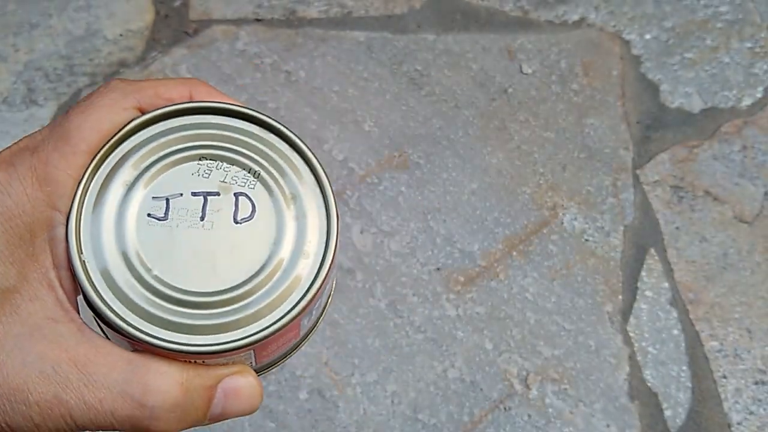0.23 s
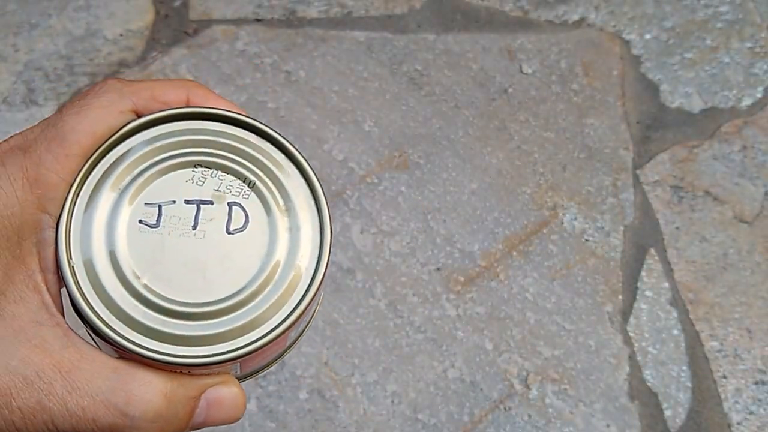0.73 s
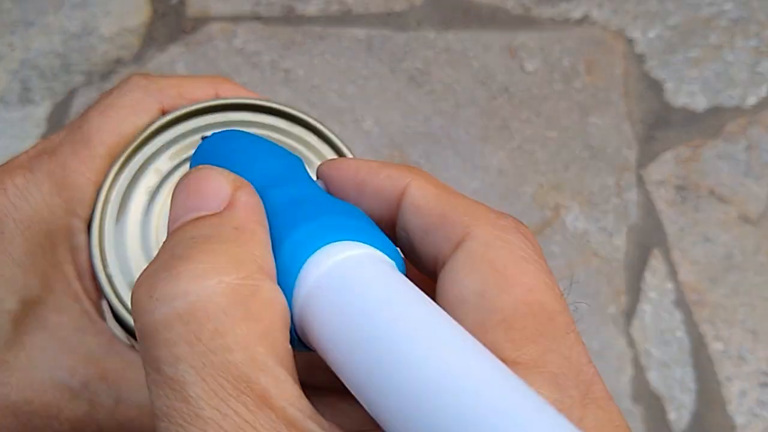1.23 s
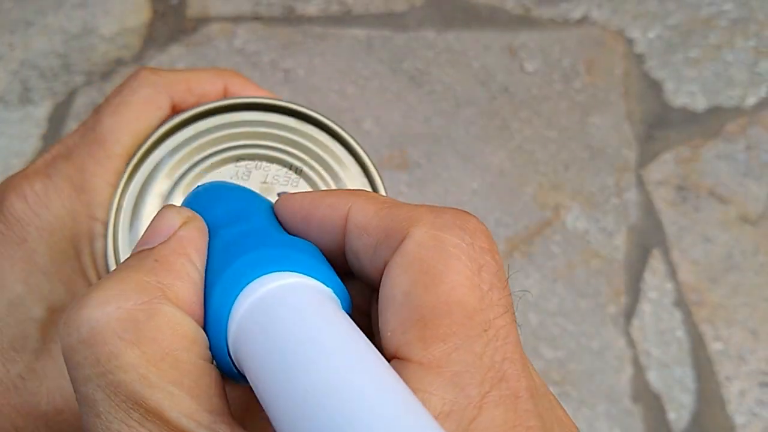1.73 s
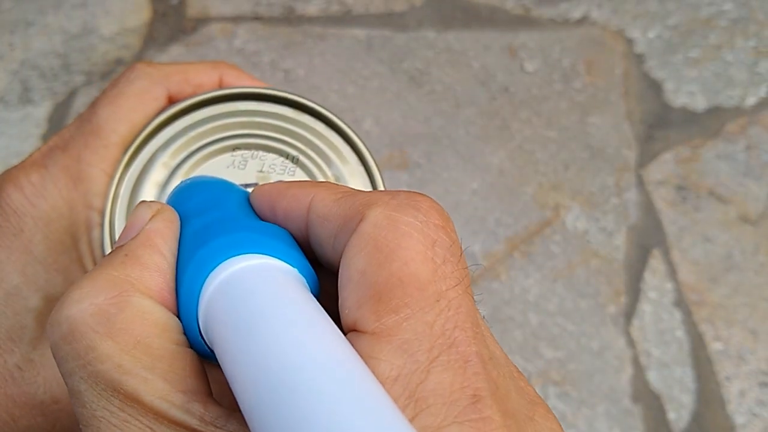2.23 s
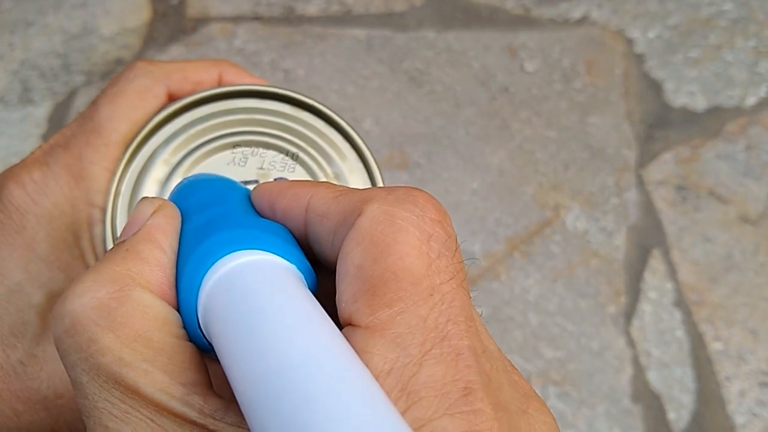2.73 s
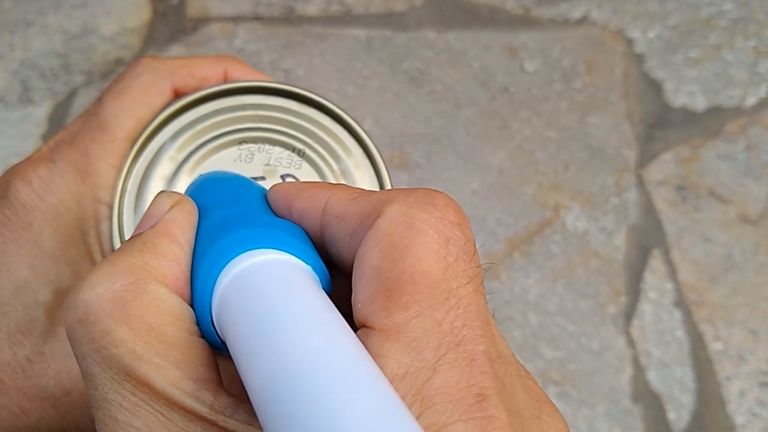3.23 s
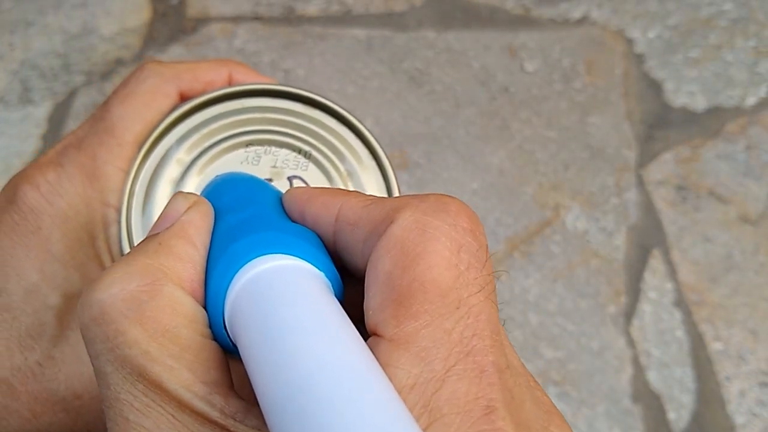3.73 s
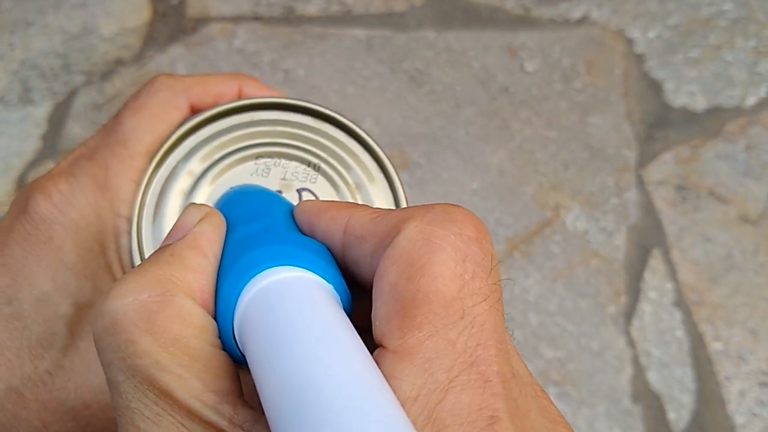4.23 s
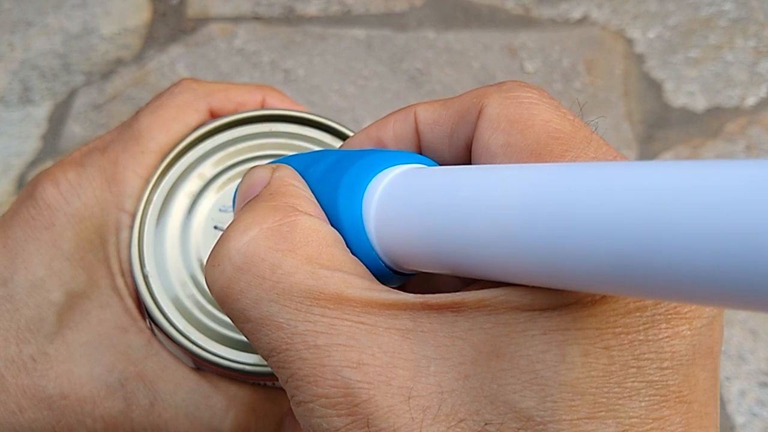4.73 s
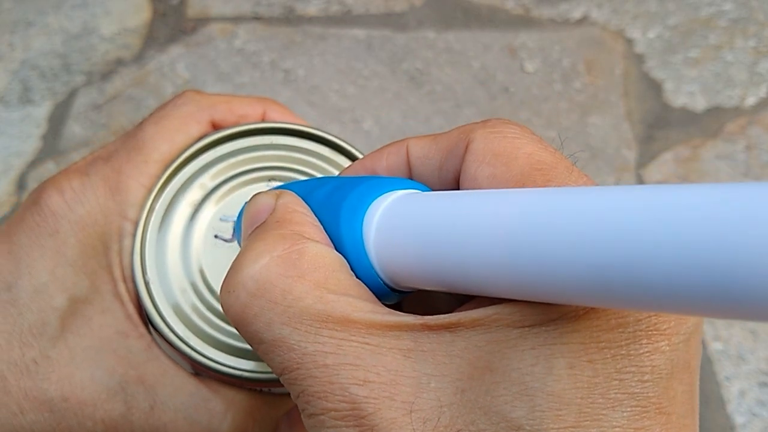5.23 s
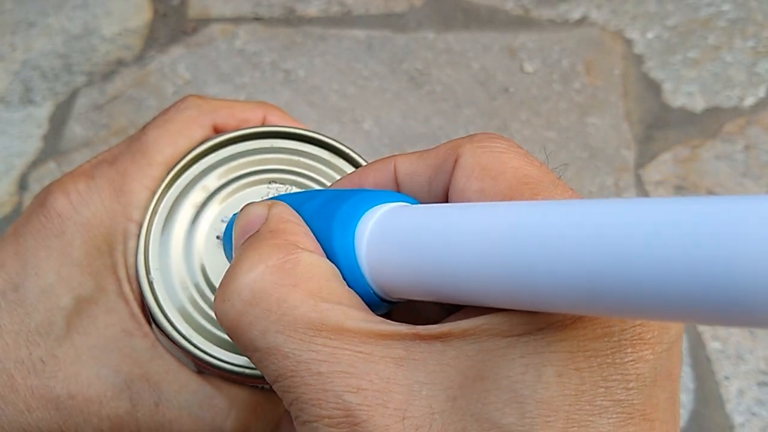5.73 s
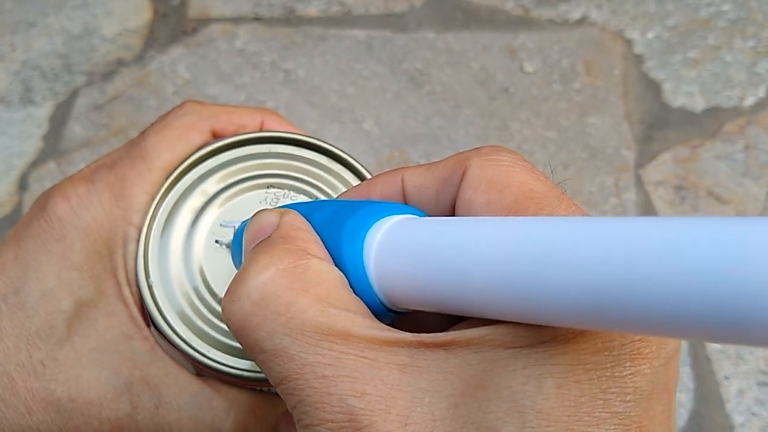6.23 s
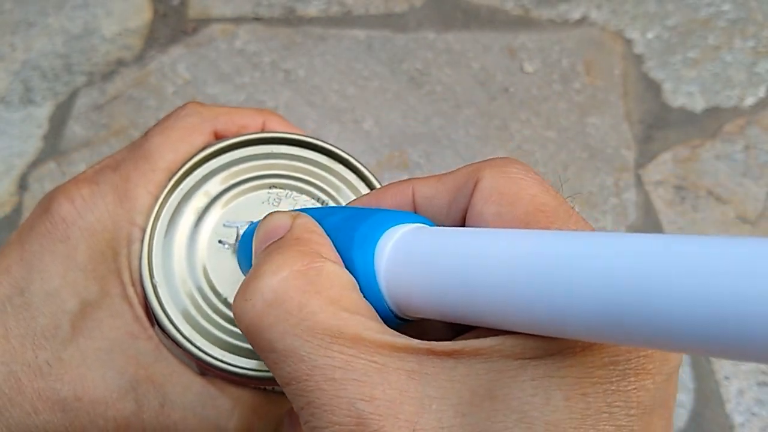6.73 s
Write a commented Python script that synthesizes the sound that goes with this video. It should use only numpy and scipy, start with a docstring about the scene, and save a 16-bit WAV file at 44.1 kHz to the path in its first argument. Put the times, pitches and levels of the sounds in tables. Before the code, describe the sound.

Fingers rub over a can and rubbery grip, with a little knock and faint squeaks, very quietly. A tiny electric engraver gives a quick test buzz, then starts properly. Bright, gritty, metallic buzzing comes and goes as the tip touches and lifts, the motor sagging under pressure and whining freely between strokes. A brief break splits two runs. Close, dry microphone, faint hiss, small dry ticks.

```python
"""Burr of a battery etching pen engraving a tin can lid, outdoors, close: two strikes a turn ring the lid's modes.
Strokes slow the motor, and its whine fades with drag; between them it runs free. One rotor times both.
The bit rings on after each lift. Fingers rub and slip in filtered grains and clicks; faint sine squeaks fall.
Also one knock (click, sinking thud), small dry ticks and a coloured hiss."""
import sys
import numpy as np
from scipy import signal
from scipy.fft import rfft, irfft, next_fast_len
from scipy.io import wavfile
from scipy.ndimage import uniform_filter1d

SR = 44100
rng = np.random.default_rng(int(sys.argv[2]) if len(sys.argv) > 2 else 0)


def inscribe(sig):
    """Save sig as 16-bit PCM at rate SR to the path in sys.argv[1].

    A 1-D sig is mono; a 2-D sig holds one channel per row.
    Samples are clipped to [-1, 1] before scaling.
    """
    pcm = np.round(np.clip(np.atleast_2d(sig).T, -1, 1) * 32767)
    wavfile.write(sys.argv[1], SR, pcm.astype(np.int16))


N = 307818
T = np.arange(N) / SR
SIZE = next_fast_len(N + 8192)
FREQ_HZ = np.maximum(np.arange(SIZE // 2 + 1) * SR / SIZE, 1)

# background hiss: t/s, relative level/dB
AIR_LEVEL = [(0, -72), (.6, -74), (1.22, -72.5), (1.27, -78.5), (6.98, -87)]
# hiss spectrum: f/Hz, gain/dB
AIR_COLOUR = [(18, -61), (30, -21), (184, -11.5), (303, -9.5), (364, -15), (540, -13), (666, -18.5),
              (2830, -26), (5310, -29), (16000, -29.5)]
# further filter on the side signal of the hiss: f/Hz, gain/dB
AIR_SIDE_COLOUR = [(100, -11.5), (380, 7.0), (700, 4.5), (1300, -9.0), (15000, -3)]
# loudest dry ticks: t/s, peak/dB
TICKS = [(2.333, -26), (2.533, -21.5), (2.8337, -24.5), (2.9333, -21.5), (4.0, -26), (4.1658, -23.5),
         (4.6332, -46), (4.767, -52), (5.3, -28.5), (5.3667, -24), (5.433, -20), (5.7667, -27.5),
         (5.999, -24.5), (6.167, -23.5), (6.3, -19.5)]
# click of the knock: f/Hz, gain/dB
CLICK_COLOUR = [(200, -1), (800, 7.5), (2000, -4), (15000, -33)]
# falling squeaks as the pen is picked up: start/s, length/s, start f/Hz, level/dB
SQUEAKS = [(1.135, 0.048, 3340, -67), (1.325, .05, 3890, -72.5), (1.34, 0.093, 2950, -71),
           (1.64, 0.058, 2800, -73), (1.776, .035, 3650, -72.5)]
# fingers rubbing on can and pen: start/s, length/s, relative level/dB
RUBS = [(0.016, 0.082, -58.5), (0.115, 0.037, -63.5), (0.214, 0.32, -62), (0.762, .04, -65.5),
        (0.82, 0.037, -65), (0.905, 0.056, -66), (1.16, .12, -63.5), (1.29, 0.434, -63.5),
        (1.736, 0.058, -68), (1.439, 0.11, -56), (1.881, 0.14, -57), (2.0, 0.45, -69.5),
        (2.168, 0.067, -59)]
# fingers catching and slipping: t/s, relative peak/dB, nominal f/Hz
SLIPS = [(0.051, -47.5, 730), (0.061, -45, 666), (0.319, -49, 587), (0.455, -45, 547), (0.774, -45, 483),
         (0.911, -52, 626), (1.229, -46.5, 614), (1.343, -49.5, 464), (1.38, -50, 657), (1.407, -46, 484),
         (1.464, -48, 690), (1.741, -50, 582), (1.908, -46.5, 884), (1.926, -43, 710), (1.954, -42.5, 580)]
# skin grain spectrum: f/Hz, gain/dB
SKIN_COLOUR = [(71, -74.5), (120, -39), (221, -6), (452, 1.5), (537, -2), (678, -1), (1270, -15.5),
               (2560, -32), (5000, -47.5), (6500, -98.5), (11000, -120)]
# motor switched on: on/s, off/s, looseness of the bit in its chuck/0-1
RUNS = [(1.485, 1.59, .7), (2.01, 4.6, .1), (4.84, 7.05, .38)]
# free-running motor, two beats a turn: t/s, beat rate/Hz, relative whine level/dB
FREE_RUN = [(1.53, 1000, -48), (2.0, 813, -58), (2.045, 948, -54), (2.18, 924, -54), (2.21, 955, -51.5),
            (2.27, 932, -52.5), (2.325, 793, -65), (2.38, 928.5, -53.5), (2.51, 912, -56), (2.8, 878, -54),
            (3.11, 852, -56.5), (3.4, 894, -55.5), (4.84, 879, -60), (4.879, 981.4, -51.5),
            (4.94, 902, -56), (5.1, 875.7, -56.5), (5.68, 898.6, -53.5), (5.85, 888.2, -52.5),
            (6.73, 809.4, -55), (6.8, 878, -55.5)]
# motor in the long stroke, hand working to and fro: t/s, beat rate/Hz
SCRIBBLE = [(3.5, 891), (3.535, 757), (3.6, 898), (3.69, 924), (3.75, 862), (3.815, 827.4), (3.86, 914),
            (3.91, 939), (3.945, 858), (3.98, 906), (4.02, 858.5), (4.095, 969), (4.145, 824), (4.19, 900),
            (4.275, 640), (4.315, 820.5), (4.355, 714.6), (4.405, 814), (4.46, 632.4), (4.505, 809.4),
            (4.58, 487)]
# whine spectra, pen upright and laid over: f/Hz, gain/dB
WHINE_UPRIGHT = [(500, -11.5), (930, -1.5), (1900, -11), (2800, -8.5), (3750, -11.5), (4700, -13.5),
                 (5650, -3), (7500, -2.5), (8400, -7), (10300, -0.5), (13200, -2), (15500, -12)]
WHINE_LAID = [(500, -12.5), (900, -5), (1800, -17.5), (2700, -15.5), (3600, -10.5), (4500, -14),
              (5400, -9.5), (7200, -6), (8400, -10.5), (11600, -4), (13500, -1.5), (15500, -17)]
# bit ringing off the lid: f/Hz, relative level/dB, t60/s
BIT_MODES = [(4590, -2.5, 0.095), (9280, -8, .11), (13600, -13.5, 0.21)]
# strokes of the burr: touch/s, lift/s, relative level/dB, relative top octave/dB, roughness light/0-1,
# roughness pressed/0-1, light beat rate/Hz, hardest press t/s, press half-length/s,
# pressed beat rate/Hz, bit ring at lift/dB
STROKES = [ (1.542, 1.555, -36, -15.5, 1, .6, 958, 1.557, 0.025, 869.9, -41),
           (2.509, 2.72, -37.5, -15.5, 0.61, 0.73, 952.4, 2.687, .038, 642, -70),
           (2.826, 3.044, -37, -15.5, 0.35, 1, 928.3, 2.94, 0.057, 759, -36),
           (3.14, 3.268, -36, -13.5, .42, 0.59, 880, 3.255, 0.054, 741.4, -50),
           (3.335, 3.451, -36, -20, 0.48, 0.58, 908, 3.413, 0.033, 701.4, -46.5),
           (3.464, 4.546, -36.5, -17, 0.58, 0.72, 891, 4.45, 0.27, 720, -54),
           (4.566, 4.587, -42.5, -35.5, .9, 1, 616.6, 4.589, 0.028, 461.8, -77),
           (5.104, 5.275, -34.5, -18.5, .5, 0.12, 938.5, 5.215, 0.059, 747.5, -42),
           (5.309, 5.471, -34, -22.5, 0.51, .28, 987, 5.405, 0.052, 715.7, -39.5),
           (5.493, 5.631, -33.5, -26, 0.28, 0.48, 957, 5.613, 0.058, 660.3, -47),
           (5.857, 6.11, -35.5, -17.5, .55, 0.25, 955, 6.075, .1, 420, -70),
           (6.075, 6.135, -32.5, -33, .9, 1, 499.5, 6.095, .02, 440, -40),
           (6.194, 6.448, -34.5, -28.5, 0.26, 1, 976, 6.42, 0.049, 697, -41),
           (6.528, 6.66, -35, -17.5, 0.5, 0.92, 821, 6.652, .032, 531.4, -49),
           (6.85, 6.903, -35, -19, 0.35, .4, 926, 6.854, 0.018, 866, -33.5)]
# lid modes: f/Hz, width/Hz, gain with pen upright/dB, gain with pen laid over/dB
LID_MODES = [(2714, 46, -2.5, -11.5), (3182, 250, -8.5, -8.5), (3586, 250, -8.5, -11),
             (4008, 163, -4, -0.5), (4534, 44, -11, -11.5), (4840, 48, -10, -7.5),
             (5347, 310, -11.5, -12.5), (5902, 134, -6, -7.5), (6410, 60, -7.5, 0), (6788, 65, 0, 0),
             (6910, 47, -5, -17), (9160, 70, 3.5, 3.5), (10780, 760, -15, -14.5), (11500, 3600, -27, -48),
             (12800, 300, -35, -19), (13030, 46, -11, -34), (15200, 2400, -26.5, -17)]
# phase between two microphones, sounds from hands and can: f/Hz, phase/rad
PORT_PHASE = [(80, 1), (200, 2.7), (700, 2.55), (1300, 1.7), (2400, .1), (4400, .1), (5300, .7), (7000, 1),
              (7600, 1.7), (8400, 2.8), (9250, 2.95), (10000, 1.5), (11200, 1.2), (12800, .1), (15500, 1.3)]

REGRIP_S = 4.72  # pen upright before, laid over after
PRESSED_BELOW_HZ = 3400
TICKS_PER_S = 30
BUMP_S = 1.069
SQUEAK_FALL_PER_S = 2  # share of start pitch
HAND_ECHO_S = 0.00033
SPIN_UP_S, COAST_S = 0.032, 0.027
ATTACK_S, RELEASE_S = 0.0039, .008  # burr meets and leaves the lid
ACCENT_DB, ACCENT_S = 1.5, 0.011  # first strikes land harder
GRAB_S, RECOVER_S = 0.025, .03  # motor takes up and sheds the load
SURGE_HZ, SETTLE_S = 90.9, .032  # overshoot when freed
FULL_DRAG = 0.37  # share of speed lost under a firm press
STALL_DB = -21.5  # times squared share of speed lost
BITE_DB, GRAZE_DB, GRAZE_S = 5, 1, 0.0072  # top octave rise: firm press; touch and lift
TOP_HZ = 15900


def undb(db):
    """Decibels to gain."""
    return 10 ** (np.asarray(db) / 20)


def rms(x):
    """Root mean square."""
    return np.sqrt(np.mean(x ** 2))


def curve(rows, x, column=1):
    """One column of a table, linearly interpolated."""
    rows = np.array(rows)
    return np.interp(x, rows[:, 0], rows[:, column])


def colour(x, points):
    """Filter by (f/Hz, gain/dB) points, interpolated over log frequency."""
    f_hz, db = np.transpose(points)
    gain = undb(np.interp(np.log(FREQ_HZ), np.log(f_hz), db))
    return irfft(rfft(x, SIZE) * gain, SIZE)[:N]


def resonance(f_hz, width_hz):
    """Response of one damped mode, unity at centre."""
    return 1 / (1 + 1j * (FREQ_HZ / f_hz - f_hz / FREQ_HZ) * f_hz / width_hz)


def bending(delay_s):
    """Bending-wave dispersion: high pitch travels faster; delay_s is the travel time at 4 kHz."""
    return np.exp(-4j * np.pi * delay_s * np.sqrt(4000 * FREQ_HZ))


def ports(spectrum):
    """Left and right signals: two microphones with a phase difference."""
    phase_rad = curve(PORT_PHASE, FREQ_HZ)
    return np.array([irfft(spectrum * np.exp(sign * .5j * phase_rad), SIZE)[:N] for sign in (1, -1)])


def walk(rate_hz):
    """Slow chance: random levels held 1 / rate_hz and slewed; unit rms."""
    hold = max(int(SR / rate_hz), 1)
    steps = np.repeat(rng.standard_normal(N // hold + 1), hold)
    x = uniform_filter1d(steps, hold)[:N]
    return x / rms(x)


def pulses(times_s, sizes, order=8):
    """Sharp pulses placed between samples by a windowed sinc."""
    at = np.floor(times_s * SR).astype(int)[:, None] + np.arange(1 - order, order + 1)
    lag = at - times_s[:, None] * SR
    shape = np.sinc(lag) * np.cos(np.pi * lag / (2 * order)) ** 2
    return np.bincount(np.clip(at, 0, N - 1).ravel(), (shape * sizes[:, None]).ravel(), N)


def gate(start_s, end_s, attack_s, release_s):
    """Envelope: rises after start_s, holds at 1, back at 0 at end_s."""
    return np.clip(np.minimum((T - start_s) / attack_s, (end_s - T) / release_s), 0, 1)


def air(level_db=0):
    """Faint hiss, wide in the low middle: independent mid and side noise."""
    mid, side = (colour(rng.standard_normal(N), AIR_COLOUR) for _ in range(2))
    side = colour(side, AIR_SIDE_COLOUR)
    return np.array([mid + side, mid - side]) / rms(mid) * undb(curve(AIR_LEVEL, T) + level_db)


def ticks(pressure, gain_db=0, faint_db=3, spread_db=4):
    """Small dry ticks, equal on both sides; fainter ones on an even grid while the burr cuts."""
    loud_s, loud_db = np.transpose(TICKS)
    grid_s = np.arange(1, int(T[-1] * TICKS_PER_S)) / TICKS_PER_S
    scatter = np.minimum(rng.standard_normal(len(grid_s)), 1.5)
    sizes = np.interp(grid_s, T, pressure) * undb(faint_db + spread_db * scatter)
    free_slot = np.abs(grid_s[:, None] - loud_s).min(axis=1) > .5 / TICKS_PER_S
    return pulses(loud_s, undb(loud_db + gain_db)) + pulses(grid_s, sizes * free_slot)


def bump(snap_db=-31, thud_db=-29, start_hz=150, end_hz=52, click_db=-41):
    """A knock: snap and noise click, then a low thud sinking in pitch."""
    sag_s, rise_s, decay_s, click_s = .01, .0063, .014, .003
    age_s = np.maximum(T - BUMP_S, 0)
    turns = end_hz * age_s + (start_hz - end_hz) * sag_s * (1 - np.exp(-age_s / sag_s))
    thud = -np.sin(2 * np.pi * turns) * np.exp(-age_s / decay_s) * (1 - np.exp(-age_s / rise_s)) ** 2
    burst = rng.standard_normal(N) * np.exp(-age_s / click_s) * (age_s > 0)
    click = colour(burst, CLICK_COLOUR)
    snap = pulses(np.array([BUMP_S]), undb([snap_db]))
    return snap + undb(thud_db) * 2 * thud + undb(click_db) * click / np.abs(click).max()


def squeaks(waver=.01):
    """Thin, unsteady sine tones that sink a little."""
    unsteady = 1 + waver * walk(300)
    total = 0
    for start_s, length_s, f_hz, db in SQUEAKS:
        pitch_hz = f_hz * unsteady * (1 - SQUEAK_FALL_PER_S * (T - start_s))
        tone = np.sin(2 * np.pi * np.cumsum(pitch_hz) / SR)
        swell = gate(start_s, start_s + length_s, length_s / 2, length_s / 2)
        total = total + undb(db) * swell * tone
    return total


def fingers(pressure, grains_per_s=500, spread_db=4.5, swell_s=0.015, rub_db=7, press_db=-28,
            slip_db=9, slip_width=0.54):
    """Skin creeps over metal and rubber in tiny slips; at times it catches and lets go with a soft click."""
    times_s = rng.uniform(0, N / SR, int(grains_per_s * N / SR))
    signs = rng.choice([-1, 1], len(times_s))
    sizes = undb(spread_db * np.minimum(rng.exponential(size=len(times_s)), 4))
    grains = colour(pulses(times_s, signs * sizes), SKIN_COLOUR)
    rubbing = sum(undb(db) * gate(s, s + length_s, swell_s, swell_s) for s, length_s, db in RUBS)
    # pressing the pen on makes the grip creak too
    sound = grains / rms(grains) * (rubbing * undb(rub_db) + pressure * undb(press_db))
    slip_s = .0035
    age_s = np.arange(SR // 40) / SR
    for slip_at_s, db, f_hz in SLIPS:
        edges_hz = [f_hz / (1 + slip_width), min(f_hz * (1 + slip_width / 2), SR / 3)]
        band = signal.butter(2, edges_hz, "band", fs=SR, output="sos")
        click = signal.sosfilt(band, rng.standard_normal(len(age_s)) * np.exp(-age_s / slip_s))
        start = int(slip_at_s * SR)
        sound[start:start + len(age_s)] += undb(db + slip_db) * click / np.abs(click).max()
    return ports(rfft(sound, SIZE))


def motor():
    """Beat rate/Hz and share lost to drag: a stroke presses the motor down, a lift lets it surge and settle."""
    free_hz = curve(FREE_RUN, T)
    speed_hz = free_hz
    for touch, lift, _, _, _, _, light_hz, hardest, half_s, pressed_hz, _ in STROKES:
        press = np.exp(-((np.minimum(T, lift) - hardest) / half_s) ** 2)
        loaded_hz = light_hz + (pressed_hz - light_hz) * press
        surge_hz = SURGE_HZ * np.exp(-np.abs(T - lift) / SETTLE_S) * (T > lift)
        load = gate(touch, lift + RECOVER_S, GRAB_S, RECOVER_S)
        speed_hz = load * loaded_hz + (1 - load) * (speed_hz + surge_hz)
    scribbling = (T > SCRIBBLE[0][0]) & (T < SCRIBBLE[-1][0])
    speed_hz = np.where(scribbling, curve(SCRIBBLE, T), speed_hz)
    return speed_hz, np.maximum(1 - speed_hz / free_hz, 0)


def rotor(speed_hz, flutter=0.0027):
    """Running beat count, beat times/s, and the side of the shaft giving each beat (+1, -1)."""
    phase = np.cumsum(speed_hz * (1 + flutter * walk(150))) / SR
    beats = np.arange(1, int(phase[-1]))
    return phase, np.interp(beats, phase, T), (-1.) ** beats


def whine(beats_s, side, drag, lopsided=0.5, level_db=1, echo=0.15, sway_s=1e-5, drag_db=-30, usual_db=-52):
    """Motor ticks on every beat through the plastic barrel, fainter under drag; looseness blurs lines to hiss."""
    loose_per_db, jitter_s, hiss = .07, 1.1e-5, .8
    db = curve(FREE_RUN, T, column=2) + drag_db * drag
    running = sum(gate(on, off, SPIN_UP_S, COAST_S) ** 2 for on, off, _ in RUNS)
    looseness = sum(loose * ((T > on) & (T < off)) for on, off, loose in RUNS)
    # the bit blurs more as the motor falters
    blur = np.clip(looseness + loose_per_db * (usual_db - db), .1, .85)
    late_s = jitter_s * np.interp(beats_s, T, blur) * rng.standard_normal(len(beats_s))
    beat = pulses(beats_s + late_s, 1 + lopsided * side * (beats_s > REGRIP_S))
    shake = np.sqrt(1 - blur ** 2) * beat / rms(beat) + hiss * blur * rng.standard_normal(N)
    # the hollow of the hand reflects; as fingers shift, single lines swell and fade
    shake = shake + echo * np.interp(T - HAND_ECHO_S - sway_s * walk(6.6), T, shake)
    upright, laid = colour(shake, WHINE_UPRIGHT), colour(shake, WHINE_LAID)
    sound = np.where(T < REGRIP_S, upright / rms(upright), laid / rms(laid)) * running * undb(db)
    return undb(level_db) * ports(rfft(sound, SIZE) * bending(0.0018))


def bit_ring(level_db=0, rise_s=0.005):
    """No longer damped by the lid, the bit rings briefly after each stroke."""
    age_s = np.arange(SR // 4) / SR
    modes = sum(undb(db) * np.sin(2 * np.pi * f_hz * age_s) * undb(-60 * age_s / t60_s)
                for f_hz, db, t60_s in BIT_MODES)
    ring = modes * (1 - np.exp(-age_s / rise_s))
    lifts_s = np.array([row[1] for row in STROKES]) - RELEASE_S
    lifts = pulses(lifts_s, undb([row[-1] + level_db for row in STROKES]))
    return ports(rfft(lifts, SIZE) * rfft(ring, SIZE))


def hand(drag, tremor_db=1.0):
    """Burr pressure, strike sharpness and bounce roughness, all following the drag."""
    firm = np.minimum(drag / FULL_DRAG, 1)
    pressure, sharpness, bounce = np.zeros((3, N))
    for touch, lift, db, top_db, light_rough, pressed_rough, *_ in STROKES:
        on = (T > touch) & (T < lift)
        accent_db = ACCENT_DB * np.exp(-(T[on] - touch) / ACCENT_S)
        graze = 1 - gate(touch, lift, GRAZE_S, GRAZE_S)[on]
        push = gate(touch, lift, ATTACK_S, RELEASE_S)[on] * undb(db + accent_db + STALL_DB * drag[on] ** 2)
        pressure[on] = np.maximum(pressure[on], push)
        sharpness[on] = undb(top_db + BITE_DB * firm[on] + GRAZE_DB * graze)
        bounce[on] = light_rough + (pressed_rough - light_rough) * firm[on]
    return pressure * undb(tremor_db * walk(35)), sharpness, np.clip(bounce, 0, 1)


def burr(phase, beats_s, side, bounce, scatter_db=3.0, lopsided=0.39, chatter_db=4):
    """Burr force: a strike on every beat, a short scrape after it; the pen chatters in the hand."""
    jitter_s, chatter_s, scrape = 2.8e-5, 6e-5, .5
    rough = np.interp(beats_s, T, bounce)
    late, hard = rng.standard_normal((len(beats_s), 2)).T
    # a bouncing burr favours one side of the shaft for a while: lines at half the beat rate
    limp = lopsided * rough * side * np.interp(beats_s, T, walk(45))
    # the whole pen rebounds over several beats, tearing the harmonics
    chatter = rough * np.interp(beats_s, T, walk(260))
    times_s = beats_s + jitter_s * (rough * late + 2 * limp) + chatter_s * chatter
    strikes = pulses(times_s, undb(scatter_db * rough * hard + chatter_db * chatter) * (1 + limp))
    grit = rng.standard_normal(N) * np.exp(-(phase % 1) / 1.2)
    force = strikes / rms(strikes) + scrape * bounce * grit / rms(grit)
    return force / np.sqrt(uniform_filter1d(force ** 2, SR // 40) + 1e-9)


def engraving(force, pressure, sharpness, drag, press_db=2, wander_db=4.0, level_db=0, top_db=13,
              edge_hz=2380, leak_db=-29):
    """The burr, pressed on in strokes, rings the lid in its modes."""
    # the small lid radiates hardly anything below its first mode
    highpass = signal.butter(6, edge_hz, "high", fs=SR, output="sos")
    radiation = signal.sosfreqz(highpass, FREQ_HZ, fs=SR)[1]
    body, top = 0, 0
    # laid over and pressed firmly, the burr drives the lowest modes harder
    laid_press = np.minimum(drag / FULL_DRAG, 1) * (T > REGRIP_S)
    for f_hz, width_hz, upright_db, laid_db in LID_MODES:
        # the tip crosses nodes and crests: each mode swells and fades on its own
        mode_db = np.where(T < REGRIP_S, upright_db, laid_db) + wander_db * walk(30)
        mode_db = mode_db + press_db * laid_press * (f_hz < PRESSED_BELOW_HZ)
        drive = force * pressure * undb(mode_db)
        response = resonance(f_hz, width_hz) * radiation
        if f_hz < 8000:
            body = body + rfft(drive, SIZE) * response
        else:
            top = top + rfft(drive * sharpness * undb(top_db), SIZE) * response
    wall = undb(leak_db) * rfft(force * pressure, SIZE) * resonance(1503, 690)
    ring = irfft(body, SIZE)[:N]
    scale = rms(pressure) / rms(ring)
    # a lid that swings hard throws the burr off, so its power follows the hand's pressure
    supplied, swing = (uniform_filter1d(v ** 2, SR // 60) + 1e-6 for v in (pressure, scale * ring))
    body = rfft(ring * np.sqrt(supplied / swing), SIZE)
    return ports((body + top + wall) * bending(.0012)) * scale * undb(level_db)


def scene():
    """One rotor drives whine and engraving; hands, knock, ticks and air are added."""
    speed_hz, drag = motor()
    pressure, sharpness, bounce = hand(drag)
    phase, beats_s, side = rotor(speed_hz)
    background = air() + ticks(pressure) + bump() + squeaks() + fingers(pressure)
    force = burr(phase, beats_s, side, bounce)
    pen = whine(beats_s, side, drag) + bit_ring() + engraving(force, pressure, sharpness, drag)
    return background + pen


def record(dry):
    """The recorder cuts the top: steep elliptic low-pass."""
    return signal.sosfilt(signal.ellip(10, .2, 70, TOP_HZ, fs=SR, output="sos"), dry)


dry = scene()
out = record(dry)
inscribe(out)
```